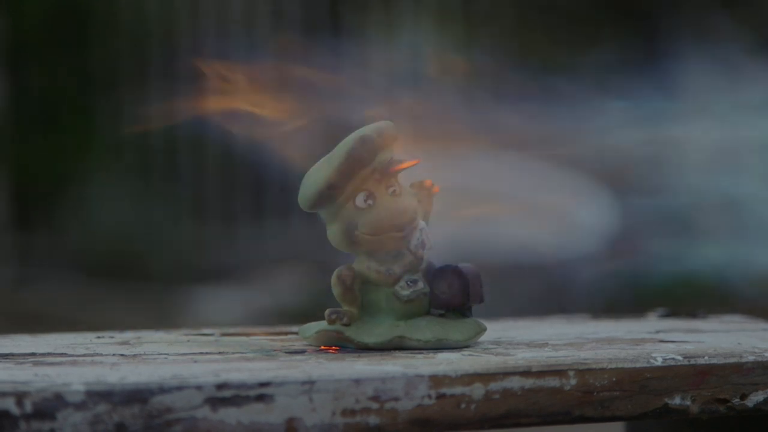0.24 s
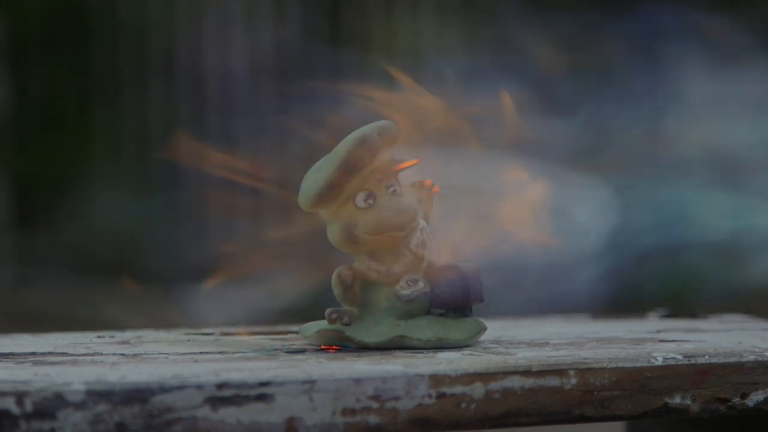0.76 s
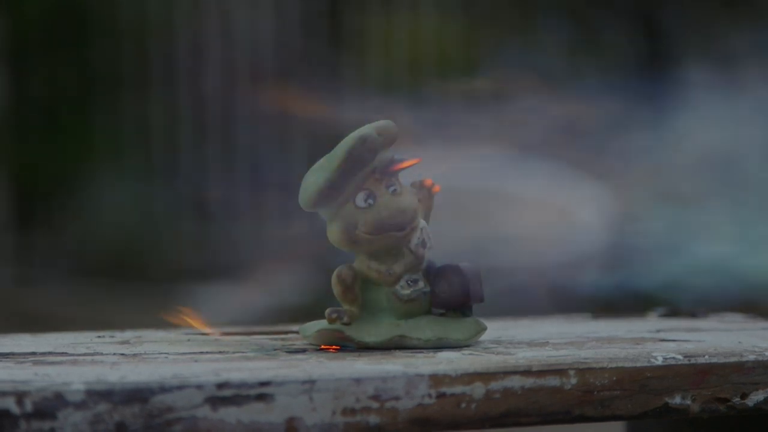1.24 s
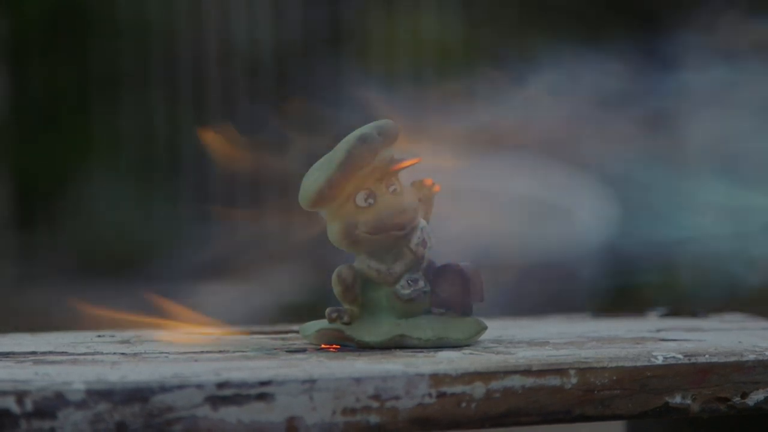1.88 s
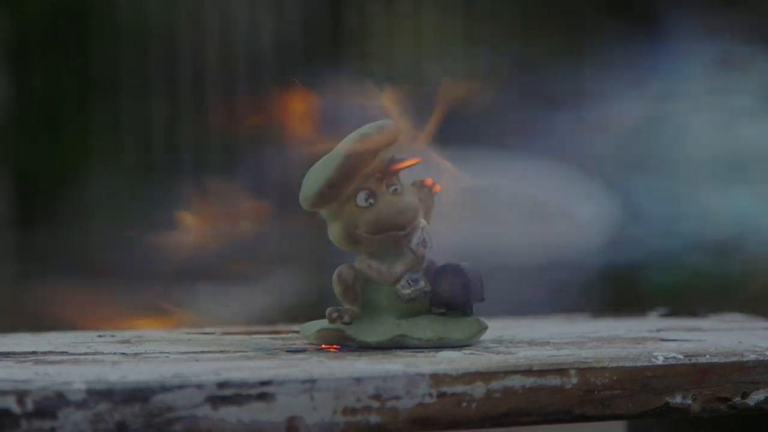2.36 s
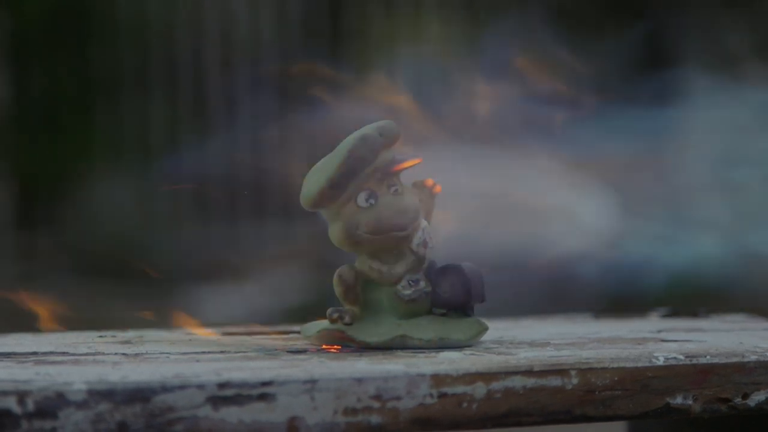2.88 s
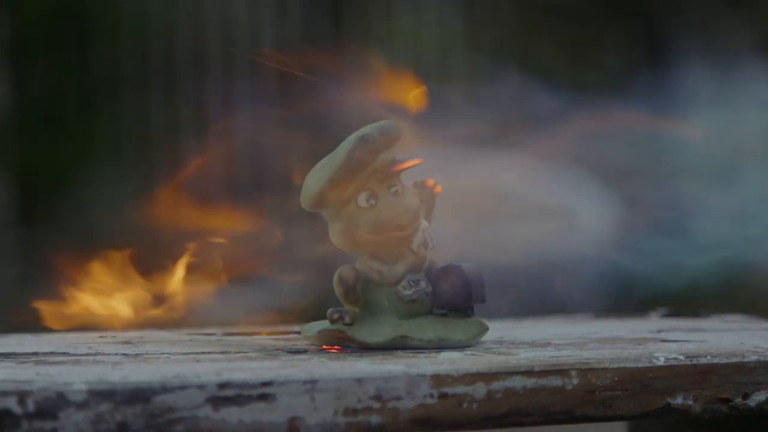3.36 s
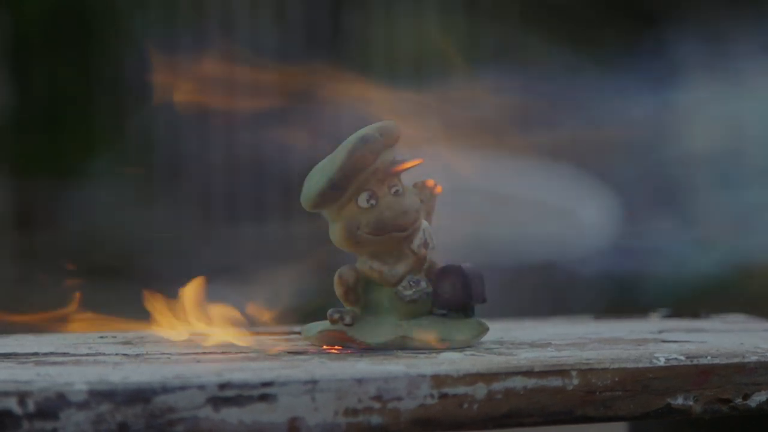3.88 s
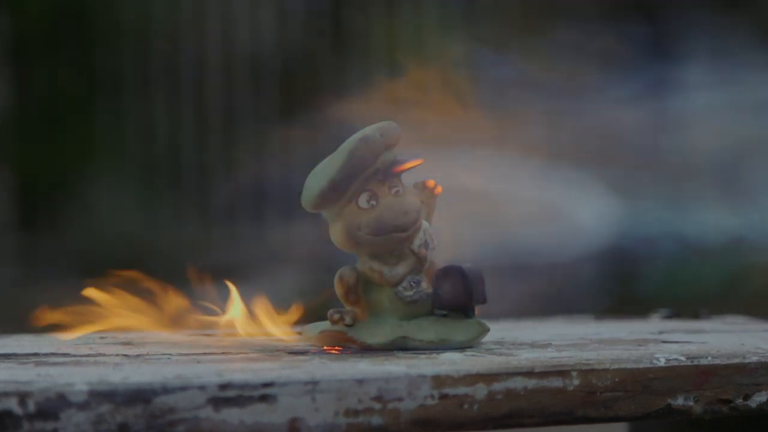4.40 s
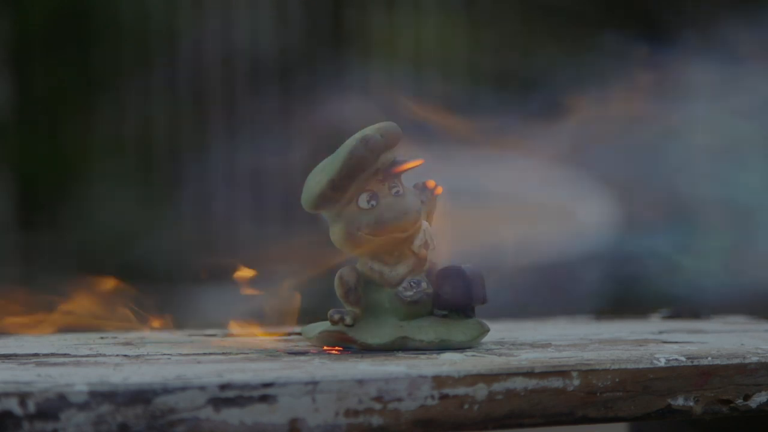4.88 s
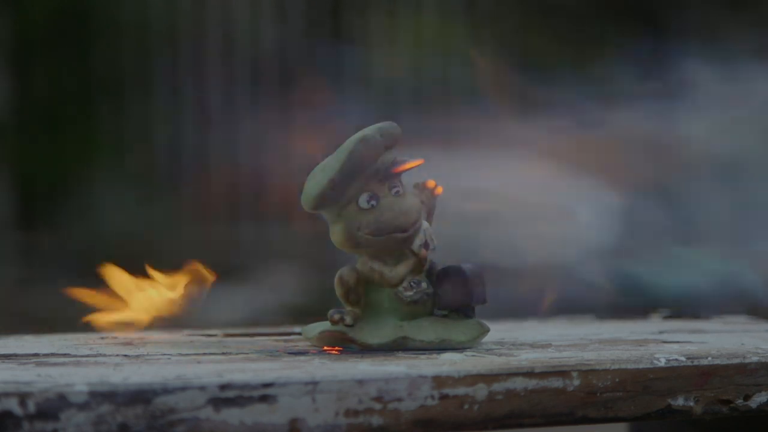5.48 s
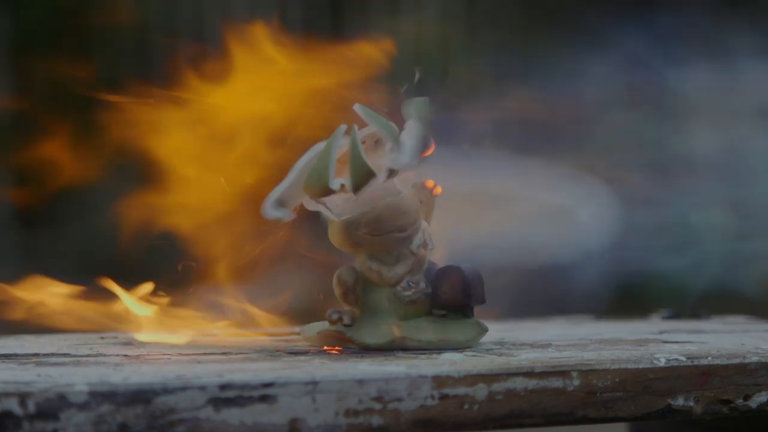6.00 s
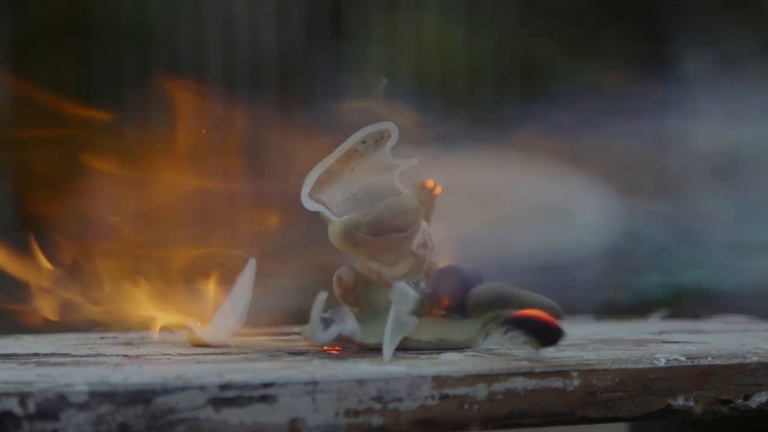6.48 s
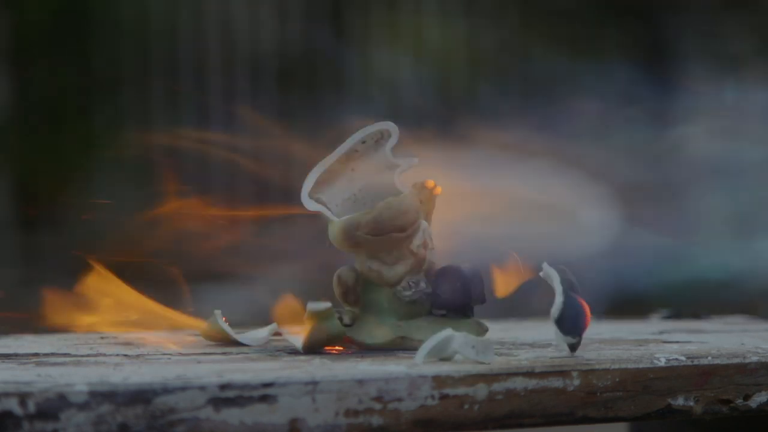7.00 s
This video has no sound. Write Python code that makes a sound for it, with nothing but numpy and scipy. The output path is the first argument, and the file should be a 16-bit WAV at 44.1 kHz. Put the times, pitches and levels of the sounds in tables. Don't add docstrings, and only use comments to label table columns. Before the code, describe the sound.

From 0 to about 7 seconds a gas torch burns without a break, aimed at a ceramic figurine on an outdoor bench. The dense, low-mid rushing roar dominates, surging slightly several times a second. Beneath it, deep rumble swells into soft booms, notably around 0.7, 2.2, 4.0, 5.4 and 6.3 s. A hollow, breathy howl wavers above the roar, dipping near 3.25 s and swelling most around 6.6 s. Steady gas hiss and faint nozzle whistles form the upper layer. Tiny, dry, high ceramic ticks occur at 3.70 and 3.74 s, then 4.54 s, almost buried; a louder, lower-pitched crack comes at 5.70 s, each with a very brief ring and weak shard rattle. The roar continues to the end, easing slightly. The sound is close, mono and dry, with slightly grainy, curtailed treble.

```python
import sys
import numpy as np
from scipy import signal
from scipy.fft import rfft, irfft, next_fast_len
from scipy.io import wavfile
from scipy.ndimage import uniform_filter1d, map_coordinates

SR = 44100
rng = np.random.default_rng(int(sys.argv[2]) if len(sys.argv) > 2 else 0)


def attenuation_scalar(level_db):
    decades = np.asarray(level_db, float) / 20
    return 10 ** decades


def transcribe(u):
    v = np.clip(np.atleast_2d(u).T, -1, 1)
    q = np.round(v * 32767).astype(np.int16)
    wavfile.write(sys.argv[1], SR, q)


N = 319725

# (frequency [Hz], density [dB per Hz])
RUMBLE_SPECTRUM = [(12, -48), (25, -15), (45, -3.5), (75, -1.5), (110, -4.5), (140, -17), (200, -42)]
ROAR_SPECTRUM = [(80, -32.5), (115, -8), (140, -4), (200, 0), (270, -3.5), (410, -3.5), (500, -5.5),
                 (550, -8.5), (650, -36)]
HOWL_SPECTRUM = [(450, -54.5), (530, -8), (570, -5.5), (602, 2), (632, 1), (670, -7), (740, -20.5),
                 (900, -48.5)]
HISS_SPECTRUM = [(600, -27), (760, -0.5), (1000, -2.5), (1400, -4), (1800, 0), (2400, -4), (2750, -9),
                 (3100, -16), (3650, -15.5), (4100, -29), (4900, -37.5), (5800, -36), (7100, -41),
                 (9600, -50)]
RIPPLE_CENTRES_HZ = [338, 538, 950, 1062, 1160, 1795, 1915, 1985, 2070, 2430, 2505, 2568, 2685, 6085, 7530,
                     8200, 8850, 9440]
# (width [Hz], level [dB])
RIPPLE_SHAPES = [(56, -7.5), (27, -3.5), (45, -6), (60, 0), (60, -6), (60, 1.5), (45, -3.5), (32, 2.5),
                 (45, -1), (35, -1), (50, -5), (55, 5), (80, -5.5), (240, 10), (380, 5.5), (600, -0.5),
                 (280, 1.5), (120, 9.5)]
# (time [s], swell [dB])
BOOM_SWELLS = [(.18, 2), (.7, 4), (2.22, 3.5), (2.75, 0.5), (3.12, 1.5), (4.0, 4.5), (4.75, -2.5),
               (5.0, -1), (5.14, 1), (5.43, 4), (6.32, 4.5), (6.87, 2), (7.0, -2.5)]
# (time [s], swell [dB])
ROAR_SWELLS = [(.12, 1.5), (.37, 2.5), (1.37, 1.5), (2.0, 2), (2.87, -0.5), (3.12, 1), (3.94, -2.5),
               (4.12, 0.5), (5.0, 2.5), (5.25, 1), (6.25, 1), (6.5, 1), (6.87, 0)]
# (time [s], swell [dB])
HOWL_SWELLS = [(.02, -0.5), (.25, 3), (.5, 1.5), (.87, 2), (1.12, 1), (1.25, 0.5), (1.74, 3), (1.88, -2.5),
               (2.04, 0.5), (2.5, 2), (2.75, -1.5), (2.87, 0.5), (3.12, 2.5), (3.25, -5), (3.87, 2.5),
               (4.12, 1.5), (4.44, 3), (4.87, -0.5), (5.5, 3.5), (6.12, 2), (6.63, 6), (6.87, 0)]
# (time [s], peak [dB], low ring [Hz], high ring [Hz], high ring re low [dB])
GLAZE_TICKS = [
    (3.7005, -51, 6000, 8100, 5),
    (3.7375, -45, 7100, 8500, -6),
    (4.5357, -47, 7100, 9000, 5),
    (5.6965, -34, 4800, 6800, 1),
]
# (rattle level [dB], rattle frequency [Hz])
SHARD_RATTLES = [(-63, 8100), (-63, 7300), (-52, 8950), (-53, 7500)]
# (frequency [Hz], share of time absent [0-1])
TREBLE_GAPS = [(6200, 0), (6650, .06), (6950, .36), (7350, .1), (7700, .05), (8050, .52), (8450, .36),
               (8850, .06), (9150, .8), (9300, .7), (9420, .45)]

RUMBLE_DB, ROAR_DB, HOWL_DB, JET_DB = -30, -23.5, -27, -33
RUMBLE_FLICKER_DB, ROAR_FLICKER_DB, HOWL_FLICKER_DB = 0.26, 0.47, 1.1
FLICKER_RATE_HZ = 9
FLARE_S = 0.063
EVEN_WINDOW_S = 0.19
RING_T60_S, SNAP_T60_S, RATTLE_T60_S = 0.0035, 0.005, 0.07
RING_ATTACK_S, SNAP_DB = 0.0003, -14


def flame():
    rumble_db = RUMBLE_DB + swells(BOOM_SWELLS, RUMBLE_FLICKER_DB)
    roar_db = ROAR_DB + swells(ROAR_SWELLS, ROAR_FLICKER_DB)
    howl_db = HOWL_DB + swells(HOWL_SWELLS, HOWL_FLICKER_DB)
    rumble = attenuation_scalar(rumble_db) * even(turbulence(RUMBLE_SPECTRUM))
    roar = attenuation_scalar(roar_db) * even(turbulence(ROAR_SPECTRUM))
    howl = attenuation_scalar(howl_db) * even(turbulence(HOWL_SPECTRUM))
    return rumble + roar + howl


def swells(rows, flicker_db):
    t = np.arange(N) / SR
    flicker = map_coordinates(rng.standard_normal(100), [t * FLICKER_RATE_HZ])
    bumps_db = sum(db * np.exp(-((t - s) / FLARE_S) ** 2) for s, db in rows)
    return flicker_db * flicker + bumps_db


def turbulence(spectrum):
    m = next_fast_len(N + 8192)
    hz = np.fft.rfftfreq(m, 1 / SR)
    f, db = np.transpose(spectrum)
    shape_db = np.interp(np.log(hz + 1), np.log(f + 1), db, left=-120, right=-120)
    for centre_hz, (width_hz, ripple_db) in zip(RIPPLE_CENTRES_HZ, RIPPLE_SHAPES):
        shape_db += ripple_db / (1 + (2 * (hz - centre_hz) / width_hz) ** 2)
    noise = irfft(rfft(rng.standard_normal(m)) * attenuation_scalar(shape_db), m)
    return unit(noise[:N])


def even(x):
    size = round(EVEN_WINDOW_S * SR)
    power = uniform_filter1d(x ** 2, size=size)
    power = uniform_filter1d(power, size=size // 2)
    return unit(x / np.sqrt(abs(power)))


def unit(x):
    return x / np.sqrt(np.mean(x ** 2))


def jet():
    return attenuation_scalar(JET_DB) * turbulence(HISS_SPECTRUM)


def glaze():
    out = np.zeros(N + SR)
    t = np.arange(SR // 20) / SR
    for (s, db, low_hz, high_hz, high_db), (rattle_db, rattle_hz) in zip(GLAZE_TICKS, SHARD_RATTLES):
        ring = np.sin(2 * np.pi * low_hz * t) + attenuation_scalar(high_db) * np.sin(2 * np.pi * high_hz * t)
        ring *= 2 * attenuation_scalar(-60 * t / RING_T60_S) * (1 - np.exp(-t / RING_ATTACK_S))
        b, a = signal.iirpeak(rattle_hz, 11, SR)
        rattle = unit(signal.lfilter(b, a, rng.standard_normal(len(t))))
        rattle *= attenuation_scalar(rattle_db - 60 * t / RATTLE_T60_S)
        snap = unit(np.diff(rng.standard_normal(len(t) + 1)))
        snap *= attenuation_scalar(SNAP_DB - 60 * t / SNAP_T60_S)
        start = round(s * SR)
        out[start:start + len(t)] += attenuation_scalar(db) * (ring + snap) + rattle
    return out[:N]


def scene():
    return (flame() + jet() + glaze())[None]


def coarse_treble(x):
    frame, width = 3072, 8
    hz, t, z = signal.stft(x, SR, "cosine", nperseg=frame)
    band = np.arange(len(hz)) // width
    chance = rng.standard_normal((band[-1] + 1, len(t)))
    chance = uniform_filter1d(chance, size=3, axis=0)
    chance = uniform_filter1d(chance, size=2, axis=1)
    rank = (chance.argsort(axis=1).argsort(axis=1) / len(t))[band]
    level = np.sqrt(abs(uniform_filter1d(abs(z) ** 2, size=width, axis=0))) + 1e-12
    loud = level > 2.2 * np.median(level, axis=1, keepdims=True)
    step = np.where(loud, 0.7, 1.25) * level
    gap_hz, gap_share = np.transpose(TREBLE_GAPS)
    kept = loud | (rank >= np.interp(hz, gap_hz, gap_share)[:, None])

    def rounded(v):
        return np.sign(v) * np.floor(abs(v) / step + 0.4) * step

    treble = kept * (rounded(z.real) + 1j * rounded(z.imag))
    z = np.where(hz[:, None] > gap_hz[0], treble, z)
    return signal.istft(z, SR, "cosine", nperseg=frame)[1][:N]


def roll_off(x):
    return signal.sosfilt(signal.butter(12, 9500, fs=SR, output="sos"), x)


def record(dry):
    bent = dry[0] - 0.17 * (dry[0] ** 2 - np.mean(dry ** 2))
    mix = coarse_treble(bent)[None]
    return roll_off(mix)


dry = scene()
out = record(dry)
transcribe(out)
```